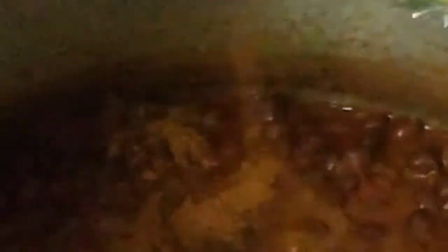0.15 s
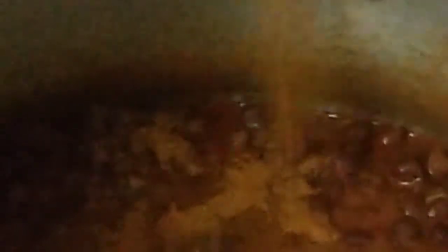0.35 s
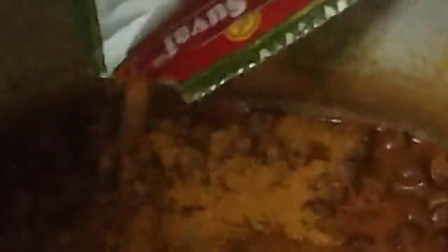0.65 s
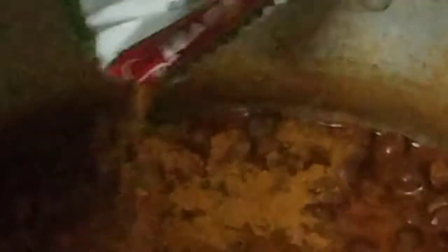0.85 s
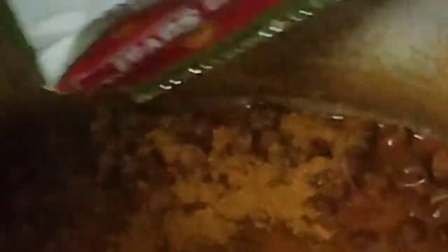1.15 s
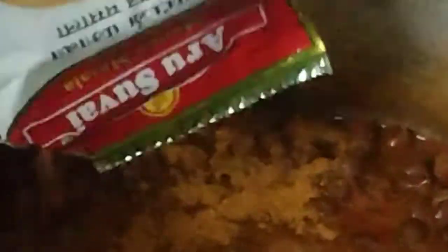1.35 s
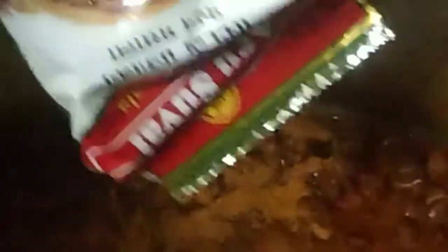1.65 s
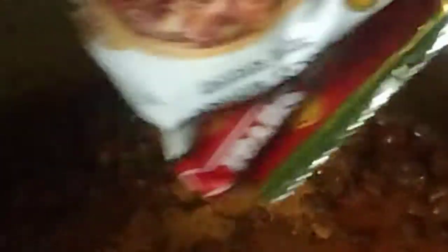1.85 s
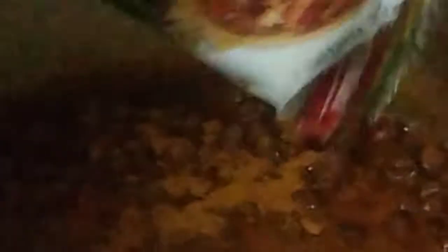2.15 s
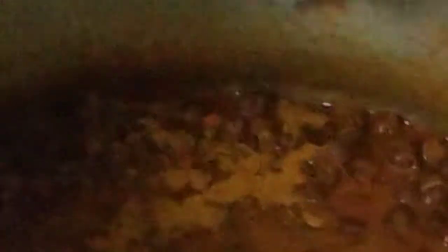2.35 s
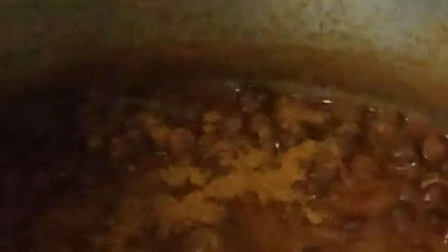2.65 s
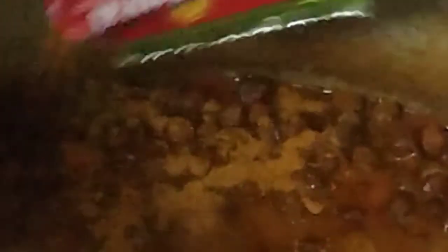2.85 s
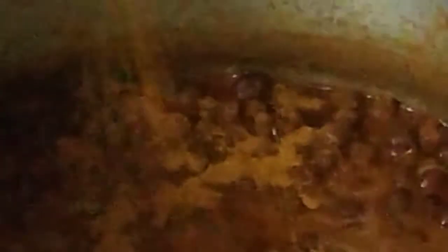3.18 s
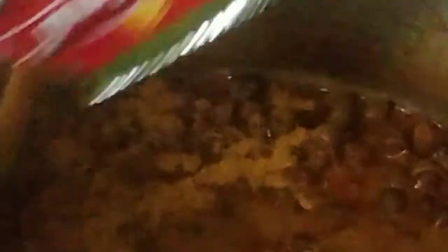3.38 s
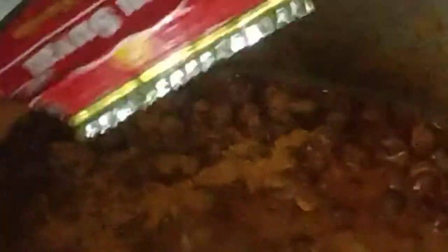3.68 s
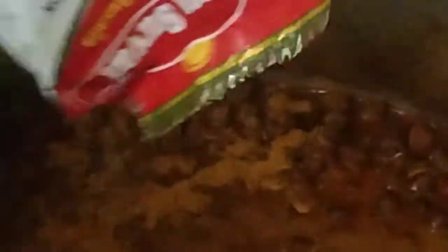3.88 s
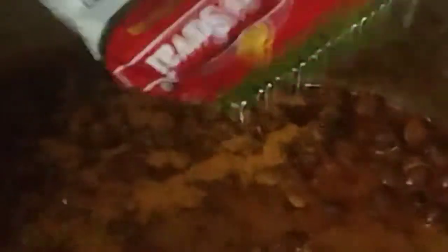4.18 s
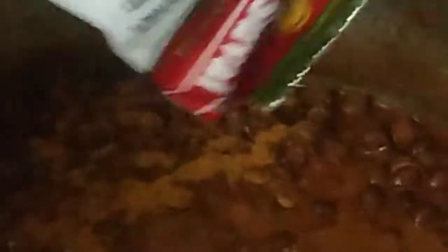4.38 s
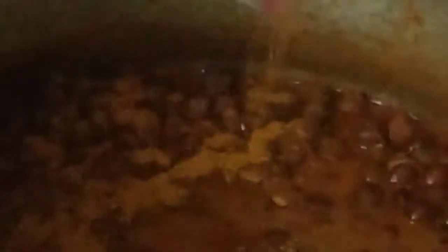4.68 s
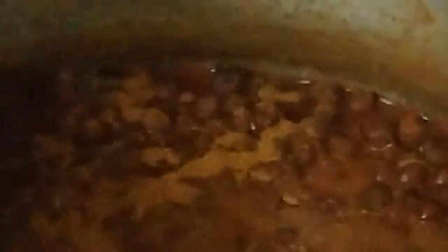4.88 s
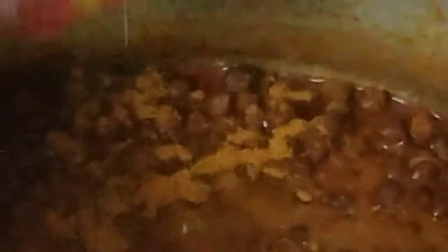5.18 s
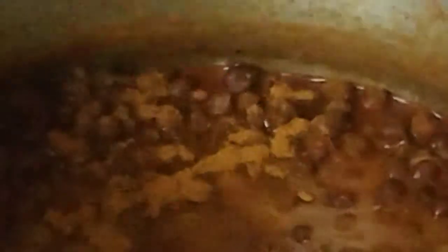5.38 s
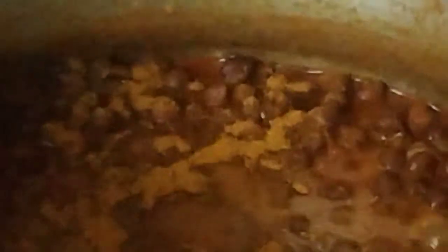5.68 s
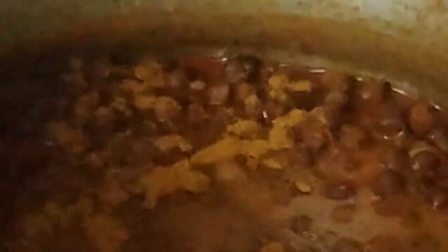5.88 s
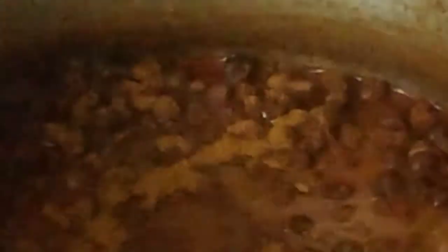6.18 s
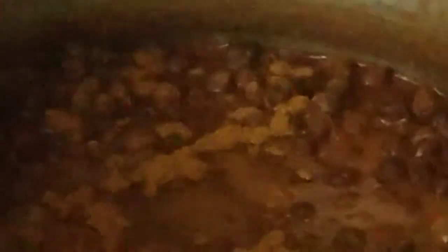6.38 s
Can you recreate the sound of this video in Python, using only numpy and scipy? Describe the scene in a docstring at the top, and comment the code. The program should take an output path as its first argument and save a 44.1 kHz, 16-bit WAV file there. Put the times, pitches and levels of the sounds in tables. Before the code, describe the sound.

Close up, thin, bright crackles and clicks come from a plastic packet shaken in short, irregular spurts. The shaking builds to a busier stretch halfway through, with a couple of very soft hand thumps, then eases to a few stray ticks. A pot of stew hisses and bubbles quietly throughout and is left almost alone at the end. The crinkling rings briefly in a small kitchen.

```python
"""A small kitchen, where a hand shakes a stiff plastic packet over a simmering pot, close to a phone.
Creases in the film buckle, in single snaps and dense crackle, and the room reverberates briefly.
The stew hisses and spits, bubbles burst, the air in the pot resonates, and the hand thumps softly.
The phone gates quiet low bands and adds a faint noise of its own."""
import sys
import numpy as np
from scipy import signal
from scipy.fft import rfft, irfft, next_fast_len
from scipy.io import wavfile
from scipy.ndimage import uniform_filter1d

SR = 44100
rng = np.random.default_rng(int(sys.argv[2]) if len(sys.argv) > 2 else 0)


def to_wav(sig):
    """Store sig (one row per channel, or 1-D mono) as 16-bit WAV at the path in sys.argv[1].

    Samples outside -1..1 are clipped; the rate is SR.
    """
    pcm = np.clip(np.atleast_2d(sig), -1, 1) * 32767
    pcm = np.round(pcm).astype(np.int16)
    wavfile.write(sys.argv[1], SR, pcm.T)  # frames by channels


N = 287973
GRAIN = 512  # samples in one click or spectral frame


def amp(db):
    """Decibels as an amplitude ratio."""
    return 10 ** (np.asarray(db) / 20)


def colour(table, size):
    """Frequency response on transform bins, interpolated from (Hz, dB) points."""
    hz, db = np.transpose(table)
    return amp(np.interp(np.log(np.fft.rfftfreq(size, 1 / SR) + 1), np.log(hz), db))


def band(lo_hz, hi_hz):
    """Steep band-pass response on the bins of one grain."""
    f = np.fft.rfftfreq(GRAIN, 1 / SR) + 1
    return 1 / np.sqrt((1 + (lo_hz / f) ** 8) * (1 + (f / hi_hz) ** 8))


def filtered(x, order, hz, kind):
    """Filtering with a maximally flat passband."""
    return signal.sosfilt(signal.butter(order, hz, kind, fs=SR, output="sos"), x)


def place(times, grains):
    """Superposition: short sounds add, each from its start time."""
    at = (np.asarray(times) * SR).astype(int)[:, None] + np.arange(grains.shape[1])
    return np.bincount(at.ravel(), grains.ravel(), N + 2 * SR)[:N]


# The phone's noise spectrum. Each row: frequency in Hz, relative density in dB.
NOISE_SPECTRUM = [(25, -42), (60, -15), (230, -4), (350, -3), (500, -6), (1000, -10), (2000, -12.5),
                  (2600, -63)]


def self_noise(rms_db=-73):
    """Noise floor: the phone adds a steady low rush of its own."""
    size = next_fast_len(N)
    noise = irfft(rfft(rng.standard_normal(size)) * colour(NOISE_SPECTRUM, size), size)[:N]
    return noise * amp(rms_db) / noise.std()


# The stew's hiss spectrum. Each row: frequency in Hz, relative density in dB.
SIMMER_SPECTRUM = [(800, -73), (1700, -11), (2150, 7.5), (2400, 8.5), (3000, 10), (3300, -10), (3900, -7.5),
                   (4300, -49), (6000, -30), (7200, -3.5), (8500, -11.5), (11500, -27), (15000, -24),
                   (15700, -39)]


def simmer(rms_db=-54.5, flicker_db=3.6):
    """Random amplitude modulation: each band of the stew's hiss flickers on its own."""
    _, _, spectra = signal.stft(rng.standard_normal(N), SR, nperseg=GRAIN)
    sway = uniform_filter1d(rng.standard_normal(spectra.shape), size=8, axis=0)
    sway = uniform_filter1d(sway, size=8, axis=1)
    spectra = spectra * colour(SIMMER_SPECTRUM, GRAIN)[:, None] * amp(flicker_db * sway / sway.std())
    hiss = signal.istft(spectra, SR, nperseg=GRAIN)[1][:N]
    return hiss * amp(rms_db) / hiss.std()


def spits(per_s=20):
    """Impulsive sources: tiny droplets burst on the stew as bright ticks."""
    when, strength = rng.random((int(per_s * N / SR), 2)).T
    hz = np.full(len(when), 2500)
    return clicks(when * N / SR, -78 + 8 * strength, hz, treble_db=12, low_db=-30, length_s=0.01)


def rings(table, t60_s, width_hz, rough, rise_s=0.0014):
    """Damped oscillation: each tone decays exponentially, its line broadened by random wavering."""
    start, db, hz = np.transpose(table)[:, :, None]
    t = np.arange(40 * GRAIN) / SR
    waver = uniform_filter1d(rng.standard_normal((len(start), 2, len(t))), int(SR / width_hz / 2), axis=2)
    waver = rough * waver / waver.std()
    fade = (1 - np.exp(-t / rise_s)) * amp(db - 60 * t / t60_s)
    phase = 2 * np.pi * hz * t
    return place(start[:, 0], fade * ((1 + waver[:, 0]) * np.sin(phase) + waver[:, 1] * np.cos(phase)))


# Bubbles in the stew. Each row: start in seconds, level before filtering in dB, pitch in Hz.
BUBBLE_BURSTS = [(0.0833, -50.5, 1380), (0.391, -51, 1344), (0.7455, -50, 1303), (1.1368, -50, 1170),
                 (1.1967, -46.5, 1074), (1.2556, -49, 1147), (1.95, -46.5, 1360), (2.809, -50, 1343),
                 (5.025, -48.5, 1340), (5.2689, -50, 1325), (5.457, -51, 1160), (5.705, -49.5, 1156),
                 (5.8242, -50, 1134), (5.8912, -43, 1255), (6.009, -41, 1226), (6.1814, -54, 1310),
                 (6.4914, -50.5, 1280)]


def bubbles():
    """Bubble resonance: each burst rings briefly as a faint blip."""
    return filtered(rings(BUBBLE_BURSTS, t60_s=0.16, width_hz=70, rough=0.66), 2, 600, "high")


# Puffs of air from the shaken packet into the pot. Each row: start in seconds, level before filtering in dB,
# pitch in Hz.
POT_PUFFS = [(0.198, -60.5, 592), (0.46, -60, 641), (0.819, -57, 580), (0.879, -65, 575), (0.955, -56, 599),
             (1.708, -62, 503), (2.001, -53.5, 600), (2.186, -59.5, 580), (2.343, -50.5, 597),
             (2.589, -54, 578), (2.646, -55, 582), (2.819, -56, 492), (2.877, -63.5, 562),
             (3.097, -53.5, 586), (3.199, -52.5, 560), (3.395, -57.5, 583), (3.503, -48, 618),
             (3.691, -47.5, 622), (3.792, -56, 590), (3.911, -57, 600), (4.024, -58.5, 598),
             (4.172, -56.5, 593), (4.509, -60.5, 622), (4.688, -60.5, 597), (5.178, -64, 592),
             (5.888, -59, 610), (6.309, -66.5, 554)]


def pot_air():
    """Cavity resonance: puffs of air from the shaken packet set the air in the pot ringing."""
    return filtered(rings(POT_PUFFS, t60_s=0.45, width_hz=70.6, rough=1.0), 4, [420, 760], "band")


# Thumps of the hand. Each row: start in seconds, peak level in dB, pitch in Hz, length in seconds.
HAND_THUMPS = [(3.0, -65, 240, 0.068), (3.192, -55, 174, 0.034), (3.681, -56.5, 370, 0.026),
               (5.386, -65, 132.7, 0.26)]


def hand_thumps():
    """Air displacement: each soft push of the hand makes a low pulse of wandering phase."""
    start, db, hz, length = np.transpose(HAND_THUMPS)[:, :, None]
    t = np.arange(32 * GRAIN) / SR
    drift = np.cumsum(rng.standard_normal((len(start), len(t))), axis=1) * 0.067
    swell = amp(db) * np.sin(np.pi * np.minimum(t / length, 1))
    return place(start[:, 0], swell * np.sin(2 * np.pi * hz * t + drift))


# The room's decay. Each row: frequency in Hz, reverberation time in seconds, relative level in dB.
ROOM_DECAY = [(610, 0.69, -15), (1460, 0.49, 0.5), (2600, 0.24, 1), (3920, 0.14, -2.5), (7400, 0.23, 0.5),
              (14700, 0.27, -5)]


def kitchen(x, gain_db=-8.5, delay_s=0.0026, positions=3, stay_s=0.028):
    """Reverberation: echoes of tiles and pot wall fade by band and vary with the packet's position."""
    size = SR // 2
    t, f = np.arange(size) / SR, np.fft.rfftfreq(size, 1 / SR) + 1
    log_hz = np.log(np.array(ROOM_DECAY)[:, 0])
    bands = [np.interp(np.log(f), log_hz, row) for row in np.eye(len(log_hz))]
    where = np.arange(N) // int(stay_s * SR) % positions
    echoes = 0
    for position in range(positions):
        noise = rfft(rng.standard_normal(size))
        tail = sum(irfft(noise * gain, size) * amp(db - 60 * t / t60)
                   for gain, (_, t60, db) in zip(bands, ROOM_DECAY))
        tail *= np.clip(t / delay_s - 1, 0, 1)
        tail *= amp(gain_db) / np.sqrt(np.sum(tail ** 2))
        share = uniform_filter1d(1. * (where == position), size=GRAIN // 8)
        echoes = echoes + signal.oaconvolve(x * share, tail)[:N]
    return echoes


# The film heard through the phone's port. Each row: frequency in Hz, relative density in dB.
FILM_SPECTRUM = [(240, -64), (400, -46), (610, -23), (929, -18), (1120, -8.5), (1350, -18), (1870, -10.5),
                 (2160, -4.5), (2810, -5), (5170, -7), (8000, -6), (12400, -31), (14900, -25.5),
                 (15700, -27.5), (16700, -80)]


def clicks(times, body_db, hz, treble_db, low_db, rise_s=0.00036, length_s=0.015):
    """Transient resonance: milliseconds of flutter ring at a pitch set, in film, by the facet size."""
    t, f = np.arange(GRAIN) / SR, np.fft.rfftfreq(GRAIN, 1 / SR) + 1
    stretch, detune, noise = np.split(rng.standard_normal((len(times), GRAIN + 2)), [1, 2], axis=1)
    flutter = rfft(noise) * colour(FILM_SPECTRUM, GRAIN)
    facet = .15 + np.exp(-.5 * (np.log2(f / hz[:, None]) / .17) ** 2)
    # the larger panel behind the facet answers at a lower pitch
    panel = .15 + np.exp(-.5 * ((np.log2(f / 1400) - .2 * detune) / .25) ** 2)
    lengths = length_s * np.exp(0.45 * stretch)
    fade = (1 - np.exp(-t / rise_s)) * amp(-60 * (t / lengths) ** 1.485)
    body, treble, low = band(1804, 4710) * facet, band(10570, 22000), band(590, 2660) * panel
    grains = 0
    for gain, db in ((body, 0), (treble, treble_db), (low, low_db)):
        part = irfft(flutter * gain) * fade
        grains = grains + part * amp(body_db + db)[:, None] / np.abs(part).max(axis=1, keepdims=True)
    return place(times, grains)


# Shakes of the packet. Each row: arrival at full strength in seconds, level in dB, hold in seconds.
PACKET_SHAKES = [(0.0, -31, 0.0039), (0.088, -36, 0.008), (0.199, -36.5, 0.1), (0.409, -36.5, 0.061),
                 (0.576, -33, 0.009), (0.83, -37.5, 0.017), (0.973, -36.5, 0.15), (1.256, -41, 0.01),
                 (1.497, -30.5, 0.0071), (1.732, -50, 0.19), (2.004, -33.5, 0.01), (2.207, -32, 0.018),
                 (2.385, -30, 0.028), (2.611, -30, 0.089), (2.887, -29.5, 0.0064), (2.978, -27, 0.028),
                 (3.097, -22, 0.12), (3.401, -24, 0.048), (3.514, -17, 0.026), (3.62, -25, 0.23),
                 (3.8, -36.5, 0.29), (4.094, -33, 0.15), (4.22, -26, 0.041), (4.464, -37, 0.058),
                 (4.56, -25.5, 0.033), (4.704, -32, 0.11), (4.886, -45.5, 0.089), (5.097, -43.5, 0.14),
                 (5.423, -38.5, 0.01)]


def shake_db(t, rise_db_per_s=387, fall_db_per_s=108.5, drop_db=6, drop_s=0.018):
    """Incoherent addition: shakes swell, hold and settle, and their powers sum where they overlap."""
    arrival, db, hold = np.transpose(PACKET_SHAKES)[:, :, None]
    before, after = np.maximum(arrival - t, 0), np.maximum(t - arrival - hold, 0)
    stop_db = drop_db * (1 - np.exp(-after / drop_s))  # extra quick fall as the hand stops
    shape_db = -rise_db_per_s * before - fall_db_per_s * after - stop_db
    return 10 * np.log10(np.sum(amp(db + shape_db) ** 2, axis=0) + 1e-18)


def crackle(per_s=240, spread_db=2.5, offset_db=-2):
    """Crackling noise: small creases flip at random, as hard as the shake drives them, a few harder."""
    when, strength, pitch, brightness = rng.random((int(per_s * N / SR), 4)).T
    times = when * N / SR
    body_db = shake_db(times) - spread_db * np.log(1 - .98 * strength) + offset_db
    return clicks(times, body_db, hz=2000 * 1.916 ** pitch, treble_db=-13 + 6 * brightness,
                  low_db=-14, rise_s=0.00011, length_s=0.014)


# Single creases. Each row: start in seconds, peak of the body band in dB, pitch in Hz,
# then treble and low band levels in dB relative to the body.
CREASE_SNAPS = [(0.0494, -31.5, 3400, -9.5, -6), (0.064, -25, 3460, -12, -22),
                (0.1877, -22, 3060, -10, -12.5), (0.205, -22, 2900, 1.5, -21), (0.214, -19, 3120, -15, -11),
                (0.2295, -24.5, 3360, -3, -9), (0.404, -25.5, 2980.0, -6, -19), (0.48, -22, 3370, -7, -18),
                (0.551, -28, 3300, -11.1, -18.5), (0.579, -25.5, 3020, -3.4, -27),
                (0.654, -26.5, 3150, -5, -3.5), (0.6952, -21, 2660, -31, -40),
                (0.7012, -19.5, 2600, -10.5, -44), (0.7622, -17, 3060, -7.5, -22),
                (0.848, -18.5, 2450, -40, -30), (0.8827, -24, 2880, -15, -28),
                (0.956, -23, 2140, -8.5, -11), (0.9755, -23.5, 2600.0, -28, -7),
                (1.0236, -21.5, 2760, -2.5, -10), (1.043, -24, 2720, -13, -34),
                (1.0831, -17.5, 3060, -14, -17.5), (1.1346, -21, 2960, -15, -29.5),
                (1.198, -24, 2480, -6.5, -48), (1.309, -12.5, 3240, -14, -17),
                (1.3787, -27.8, 3620, -12.5, -22), (1.478, -20, 2140, -16, -20),
                (1.485, -15, 3150, -22, -17), (1.4974, -13, 3260, -15.5, -52),
                (1.5285, -24.5, 3600, -7, -21), (1.584, -28.5, 2970, -25, -4.5),
                (1.7012, -18, 2900, -12, -20.5), (1.751, -22.5, 2900, -8.5, -16),
                (1.7805, -28, 3440, -12, -19), (1.876, -34, 3300, -1, -41.7), (1.9448, -26, 2820, -10, -29),
                (1.9718, -23.5, 3380, 2.5, -26), (2.0029, -8, 2860, -17, -14.5),
                (2.2106, -21.5, 2610, -4, -15.5), (2.221, -24, 2630, -3.5, -22),
                (2.37, -22, 2730, -34, -19), (2.3842, -13.5, 2670, -13, -19),
                (2.466, -23.5, 2720, -4.5, -34), (2.5372, -27, 3120, -7, -36),
                (2.5995, -16.5, 2920, -9, -7), (2.628, -20.5, 3620, -3.5, -6.5),
                (2.8615, -24.5, 3300, -2, -24), (2.8988, -17.5, 3500, -10, -8.5),
                (2.9875, -23.5, 2630, -26, -29), (3.016, -10.5, 2830, -17, -15.5),
                (3.107, -16, 2110, -19, -11), (3.1587, -14.5, 2620, -2, -9.5),
                (3.1786, -12.5, 3270, -8, -10), (3.2014, -19.5, 3600, -3, -9),
                (3.3599, -28, 2670, -10, 0.5), (3.3947, -16.5, 3580, -10.5, -33),
                (3.5016, -13, 3160, -7.5, -13), (3.5316, -27, 2700, -8, 2.5), (3.66, -19, 2820, -24, -6),
                (3.682, -15, 2380.0, -13, -28), (3.6904, -14.5, 2470, -4.5, -8.5),
                (3.6988, -14, 3040, -10, -17), (3.725, -16, 2480, -13, -39), (3.7373, -18.5, 2810, -3, -33),
                (3.786, -13.5, 2440, -9, -14.5), (3.8322, -26.5, 3650, 3, -18),
                (3.8551, -16.5, 2610, -5, -11.5), (3.9458, -29, 3086, -2, -17),
                (3.98, -30, 2650, -9.9, -18), (4.0263, -9, 2150, -11.5, -16.5),
                (4.1849, -18.5, 3000, -9, -22), (4.245, -13.5, 3530, -9, -46),
                (4.412, -29.5, 2960, -10, -8.5), (4.461, -22, 3200, -11.5, -5),
                (4.511, -22.5, 3080, -5.5, -6), (4.558, -18, 2710, -3.5, -23),
                (4.5804, -20.5, 2870, -21, -11), (4.643, -15, 3300, -11, -4.5),
                (4.689, -15.5, 3350, -9.5, -3), (4.7457, -16.5, 2980, -5, -11),
                (4.7564, -16, 3140, -4.5, -17), (4.782, -19, 3080, -24, -33),
                (4.874, -23.5, 2800, -9.5, -8), (5.0248, -31, 3100, -13.5, -13.5),
                (5.1, -27.5, 2950, -29, -8.5), (5.1222, -26, 2830, -16, -7.5),
                (5.2069, -28, 2850, -32, -18), (5.3768, -26.5, 2900, -15, -41),
                (5.391, -21.5, 2860, -37, -55), (5.4218, -20.5, 2700, -16.5, -12.5),
                (6.2135, -33.5, 2980, -17, -45), (6.3017, -40, 3580, 1, -28),
                (6.4478, -65.5, 2870, 26.5, -44), (6.514, -36.5, 2420, -9, -22)]


def crease_snaps():
    """Snap-through buckling: a crease flips over and releases its stored strain as a click."""
    return clicks(*np.transpose(CREASE_SNAPS))


def scene():
    """Superposition: the packet, its echoes, the stew and the hand add in one channel."""
    film = filtered(crease_snaps() + crackle(), 6, 750, "high")  # thin film radiates little bass
    stew = pot_air() + bubbles() + spits() + simmer()
    return (film + kitchen(film) + stew + hand_thumps())[None, :]


# The phone's gate threshold. Each row: frequency in Hz, level in dB below which a band closes.
GATE_KNEE = [(430, -82), (700, -72), (1200, -65.5), (2000, -70)]


def record(dry, top_hz=16800):
    """Spectral gating: the phone shuts quiet low bands, adds its own noise and cuts the highest treble."""
    f, _, spectra = signal.stft(dry[0], SR, nperseg=GRAIN)
    power = uniform_filter1d(np.abs(spectra) ** 2, size=11, axis=1, origin=5)
    knee_power = colour(GATE_KNEE, GRAIN)[:, None] ** 2
    gate = 1 / (1 + (knee_power / (power + 1e-18)) ** 3)
    in_range = (f > GATE_KNEE[0][0]) & (f < GATE_KNEE[-1][0])
    gated = signal.istft(spectra * np.where(in_range[:, None], gate, 1), SR, nperseg=GRAIN)[1][:N]
    low_pass = signal.ellip(10, .2, 70, top_hz, fs=SR, output="sos")
    return signal.sosfilt(low_pass, (gated + self_noise())[None, :])


dry = scene()
out = record(dry)
to_wav(out)
```